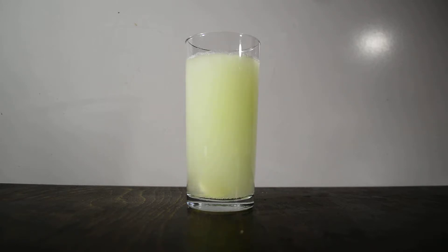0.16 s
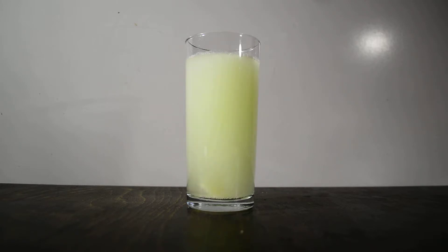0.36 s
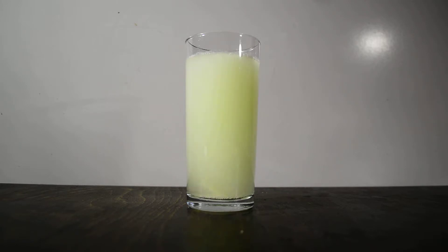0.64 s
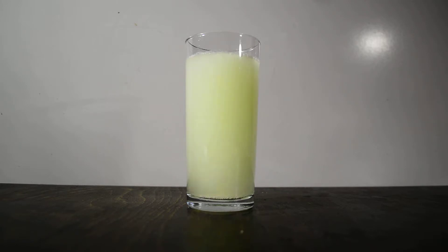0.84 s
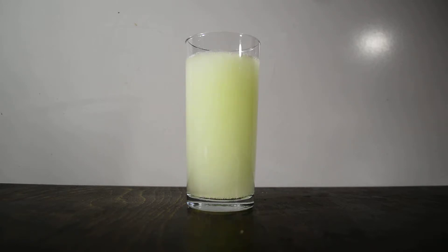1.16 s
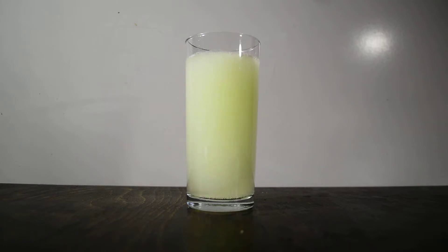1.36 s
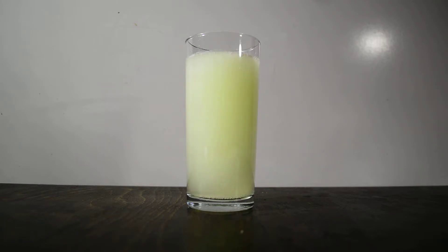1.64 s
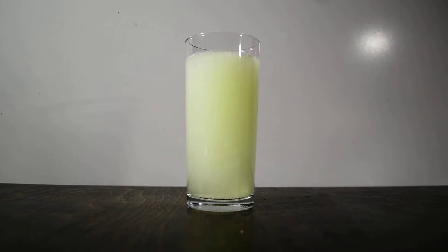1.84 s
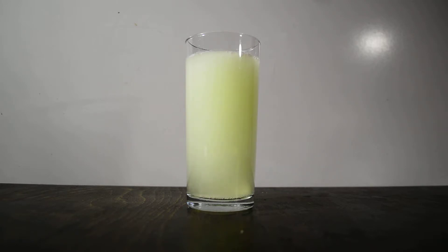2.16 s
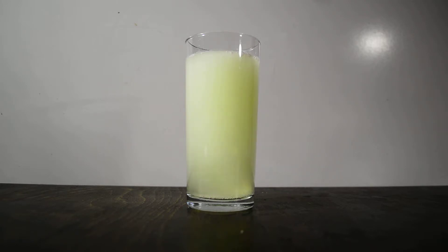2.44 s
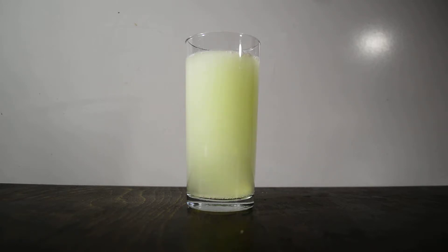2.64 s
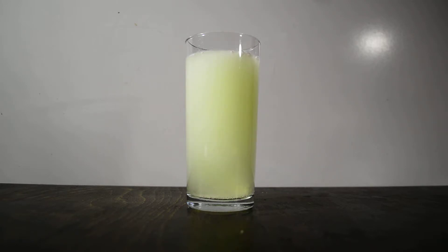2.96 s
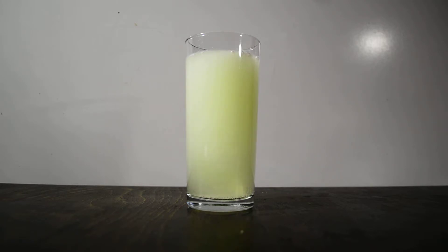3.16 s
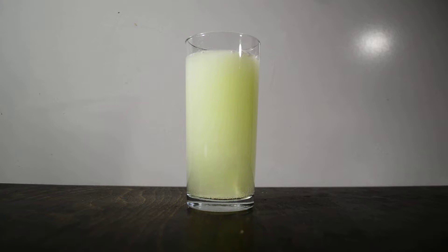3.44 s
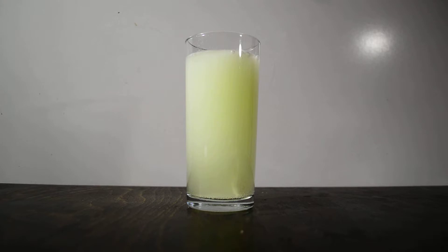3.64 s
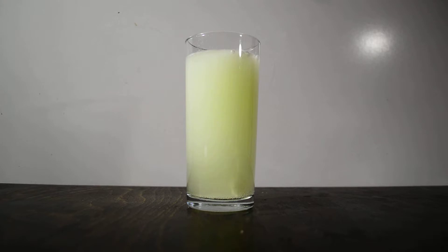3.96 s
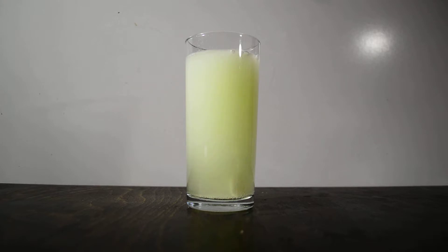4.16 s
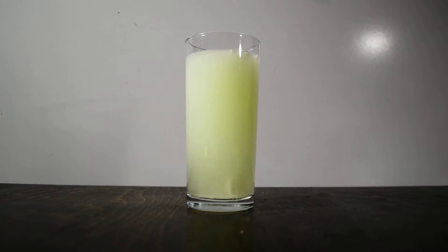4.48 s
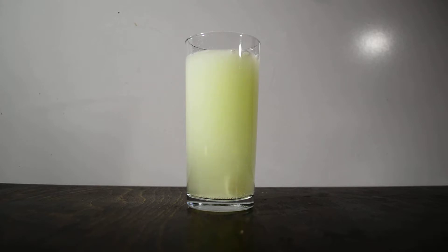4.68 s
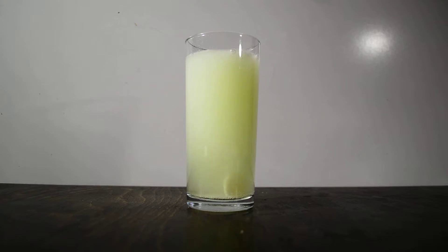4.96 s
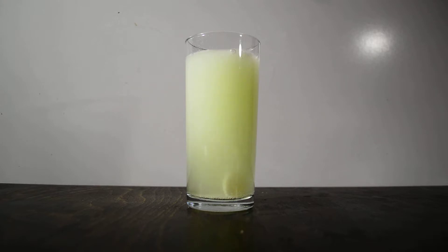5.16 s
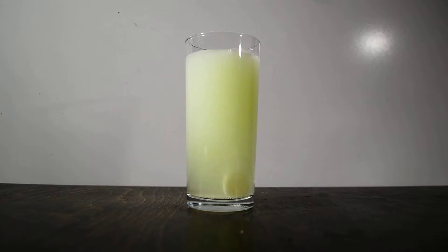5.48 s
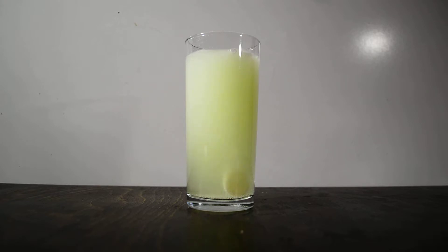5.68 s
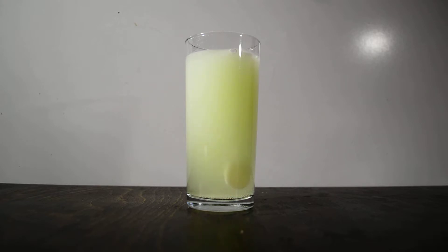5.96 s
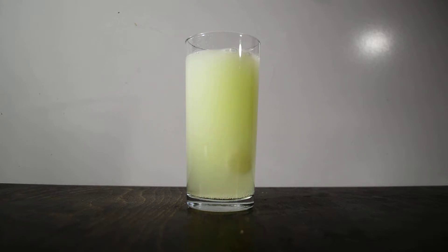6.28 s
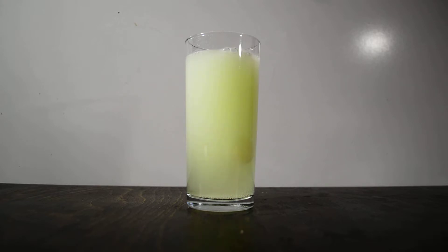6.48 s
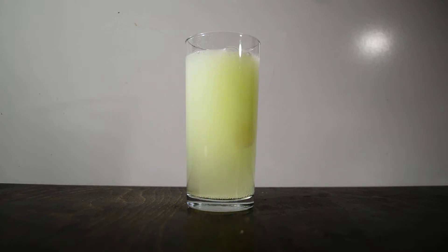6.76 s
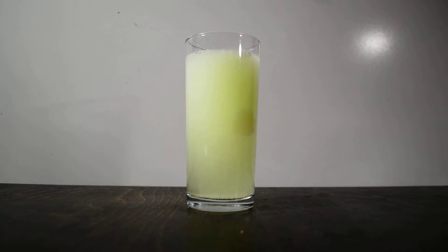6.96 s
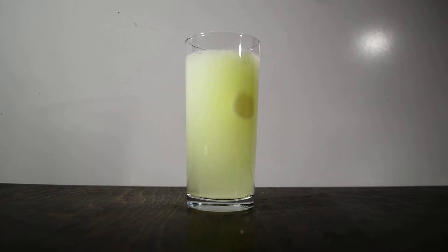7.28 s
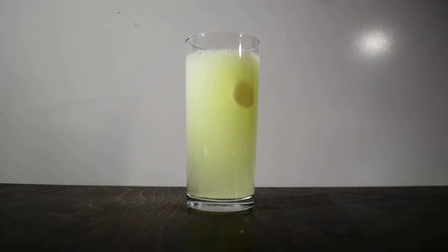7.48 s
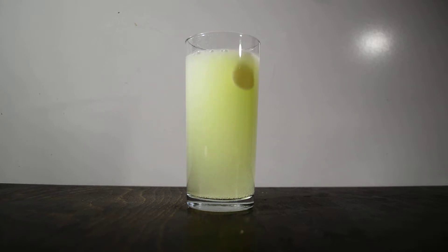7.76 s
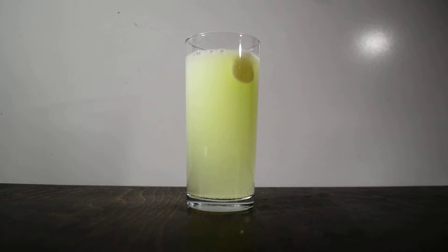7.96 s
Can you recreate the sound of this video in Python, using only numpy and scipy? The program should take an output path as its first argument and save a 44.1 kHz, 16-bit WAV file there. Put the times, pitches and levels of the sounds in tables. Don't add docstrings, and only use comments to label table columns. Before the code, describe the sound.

A tablet dissolves in a tall glass of water, heard very close in stereo. Thousands of tiny bubbles make a continuous bright, crackling hiss that begins fairly soft and fine, then grows louder and coarser as the tablet rises. Single larger bubbles pop sharply to left and right. A faint low electrical hum, room rumble and microphone hiss lie beneath in a quiet indoor room.

```python
import sys
import numpy as np
from scipy import signal
from scipy.fft import rfft, irfft, next_fast_len
from scipy.io import wavfile

SR = 44100
rng = np.random.default_rng(int(sys.argv[2]) if len(sys.argv) > 2 else 0)


def transcribe(signal):
    frames = np.atleast_2d(signal).T
    limited = np.clip(frames, -1, 1)
    pcm = np.round(limited * 32767).astype(np.int16)
    wavfile.write(sys.argv[1], SR, pcm)


def level_to_linear(level):
    exponent = np.asarray(level, float) / 20
    return 10 ** exponent


N = 358091
PADDED = next_fast_len(N)
GRID_HZ = np.arange(PADDED // 2 + 1) * SR / PADDED + 1e-3

SIZE_HZ = [2450, 4200, 5370, 7600, 13000]


def bursts(per_s, cycles, spread_db, surge_db, patch_db):
    size_lean = [.2, 0.97, 0.39, .2, .1]
    classes_db, lean_db = froth()
    strengths = level_to_linear(spread_db * np.minimum(rng.exponential(1, (2, N)), 5))
    strengths = strengths * rng.choice([-1, 1], (2, N))
    surge = drift(10.0) + drift(25.0)
    halves = np.zeros((2, N))
    for k, hz in enumerate(np.geomspace(700, 16500, 40)):
        share = np.array([np.interp(np.log(hz), np.log(SIZE_HZ), one) for one in np.eye(len(SIZE_HZ))])
        lean = (share @ size_lean) * lean_db * [[.5], [-.5]]
        flicker = surge_db * surge + patch_db * np.array([drift(11.0), drift(14.0)])
        born = rng.random((2, N)) < per_s * hz / 5000 / SR
        rings = ring(np.roll(strengths, 997 * k, axis=1) * born, hz, cycles)
        level = level_to_linear(share @ classes_db + lean + flicker)
        halves += level * rings * np.sqrt(hz) / np.std(rings)
    return halves / np.std(halves)


def froth():
    # time [s], froth level [dB], mist level [dB], left-right lean [dB].
    activity = [(0.0, -43.5, -45, 1), (0.4, -43, -44, -1), (1.0, -41.5, -44, -2.5), (1.5, -42, -44.5, -3.5),
                (2.0, -40.5, -42.5, -3), (2.5, -38.5, -42.5, -4), (3.0, -37, -42, -5),
                (3.5, -36, -41, -2.5), (4.0, -35, -41, -5), (4.5, -35, -41, -4), (5.0, -34, -40.5, -4),
                (5.5, -33, -40.5, -1.5), (6.0, -33, -40, -4.5), (6.5, -33, -40, -1),
                (7.0, -32, -40.5, -1.5), (7.55, -31.5, -42, 0), (7.8, -29.5, -43.5, -0.5),
                (8.12, -28, -43.5, 0)]
    size_froth = [1.01, 1.06, 1.09, 0.16, .01]
    size_mist = [-0.18, 0.02, 0.36, 0.53, 1.2]
    # time [s], length [s], pitch [Hz], level [dB].
    rafts = [(.05, 0.26, 5370, 7.5), (.6, 0.14, 5370, -5), (1.25, .08, 4200, 1), (1.3, .25, 5370, -2.5),
             (1.88, .1, 5370, -3), (2.25, 0.12, 5370, -6), (2.8, .1, 5370, 1), (3.5, 0.37, 5370, 2),
             (3.62, .08, 4200, 2.5), (3.9, 0.13, 2450, -1.5), (4.08, 0.11, 4200, 4), (4.4, .15, 5370, 2),
             (4.75, 0.11, 4200, 2.5), (5.0, 0.089, 4200, 2), (5.38, 0.092, 4200, 2.5),
             (5.5, .3, 5370, -0.5), (5.8, 0.27, 4200, 3), (5.997, 0.074, 5370, -2.5), (6.5, 0.16, 4200, -2),
             (6.7, .35, 5370, 2.5), (7.07, .1, 4200, -2), (7.3, 0.11, 5370, 2), (7.383, 0.1, 2450, 2),
             (7.848, 0.29, 2450, 2.5), (8.0, .15, 5370, -1)]
    froth_db, mist_db, lean_db = (curve - curve.mean() for curve in in_time(activity))
    classes_db = np.outer(size_froth, froth_db) + np.outer(size_mist, mist_db)
    return classes_db + swells(rafts, SIZE_HZ), lean_db


def ring(clicks, hz, cycles):
    r = level_to_linear(-60 * hz / (cycles * SR))
    w = 2 * np.pi * hz / SR
    section = [1 - r, 0, r - 1, 1, -2 * r * np.cos(w), r * r]
    return signal.sosfilt([section] * 2, clicks + 1e-18)


def glass_mouth(halves, hz):
    # frequency [Hz], level [dB per Hz].
    surface = [(600, -51), (1000, -21), (1400, -14.5), (2100, -16.5), (3400, -13), (6000, -8.5),
               (9500, -8.5), (13000, -6.5), (14500, -7.5), (15800, -16)]
    # frequency [Hz], width [Hz], lift left [dB], lift right [dB].
    modes = [(2532, 415, 8.5, 10.5), (2956, 460, 4.5, 4.5), (3430, 430, 2.5, -3), (3963, 546, 7, 8.5),
             (4400, 363, 11, 9), (4770, 210, -0.5, 0), (5500, 537, 9, 8.5), (5800, 380, -2, -1.5),
             (6640, 440, 4.5, 4), (7950, 1370, 7, 6.5), (13800, 500, -3.5, -2)]
    # frequency [Hz], left-right likeness [0 to 1].
    likeness = [(800, .99), (2800, 0.95), (3500, 1), (4150, 0.14), (6800, 0.083), (7500, 0.8), (8200, 0.22),
                (10000, 0.023)]
    # frequency [Hz], left over right [dB].
    balance = [(1000, -5), (2500, -4.5), (5000, -4.5), (8000, 3), (12000, 2), (15500, -1)]
    turn = .5 * np.arcsin(np.clip(at_hz(likeness, hz), 0, 1))
    mixed = colour(halves, np.cos(turn)) + colour(halves[::-1], np.sin(turn))
    gain = level_to_linear(at_hz(surface, hz) + at_hz(balance, hz) * [[.5], [-.5]])
    for mode_hz, width_hz, *lift_db in modes:
        lift = level_to_linear(np.array(lift_db))[:, None] - 1
        gain = gain * (1 + lift * resonance(hz, mode_hz, width_hz))
    late_s = np.array([[0], [2.2e-5]])
    return colour(mixed, gain * np.exp(-2j * np.pi * hz * late_s))


def pops(swell_s, trim_db):
    # time of the crest [s], pitch [Hz], left peak [dB], right peak [dB].
    big_bubbles = [(0.0109, 4450, -27, -45), (0.1088, 4360, -33, -31), (0.151, 4390, -28, -45),
                   (0.161, 5360, -29, -40), (0.8857, 4400, -31, -50), (0.9891, 6850, -31, -56),
                   (1.1161, 5600, -30, -38), (1.356, 4320, -43, -28), (1.3741, 5440, -42, -33),
                   (1.6304, 4290, -31, -48), (1.6458, 4430, -34, -51), (2.0345, 5420, -32, -41),
                   (2.6721, 4390, -29, -46), (2.7379, 6570, -29, -41), (2.7497, 5510, -43, -23),
                   (3.6934, 5500, -32, -30), (4.053, 6730, -26, -40), (4.0743, 4260, -23, -23),
                   (4.4857, 4450, -35, -24), (4.6649, 4220, -40, -33), (5.0209, 5190, -22, -42),
                   (5.6884, 4270, -30, -27), (5.819, 5310, -27, -33), (6.102, 5550, -39, -24),
                   (6.2512, 4250, -37, -25), (6.2916, 5600, -43, -21), (6.5147, 5500, -29, -25),
                   (7.2254, 5310, -28, -26), (7.941, 5400, -29, -23), (7.9777, 4150, -31, -17)]
    length = 600
    out = np.zeros((2, N + length))
    t = np.arange(length) / SR
    shape = t / swell_s * np.exp(1 - t / swell_s)
    for s, hz, *peak_db in big_bubbles:
        i = max(round((s - swell_s) * SR), 0)
        peak = level_to_linear(np.array(peak_db)[:, None] + trim_db)
        out[:, i:i + length] += peak * shape * np.sin(2 * np.pi * hz * t)
    return out[:, :N]


def mains_hums():
    # multiple of the mains, left level [dB], right level [dB], lead of the right [rad].
    partials_50 = [(1, -52, -70, 2.0), (2, -74, -76, .6), (3, -63, -63.5, .6), (4, -63, -60.5, .45),
                   (5, -69, -65, 1.0), (6, -73, -72, 1.3), (7, -82, -72, .1), (11, -84, -76, .5),
                   (13, -84, -76, .5), (15, -84, -77, .5)]
    # multiple, left level [dB], right level [dB], lead of the right [rad].
    partials_60 = [(1, -61, -65.5, .7), (2, -65, -66.5, .55), (3, -70.5, -71, .5), (4, -72.5, -72, .5)]
    return hum(partials_50, 50.023, crest_s=-.0055) + hum(partials_60, 60.014, crest_s=-.0017)


def hum(partials, mains_hz, crest_s):
    turn = 2 * np.pi * mains_hz * (np.arange(N) / SR - crest_s)
    starts = rng.uniform(0, 2 * np.pi, len(partials))
    starts[0] = 0
    out = np.zeros((2, N))
    for (k, left_db, right_db, lead), start in zip(partials, starts):
        peak = np.sqrt(2) * level_to_linear(np.array([[left_db], [right_db]]))
        out += peak * np.cos(k * turn + start + np.array([[0], [lead]]))
    return out


def background(hz):
    # frequency [Hz], level [dB per Hz].
    room = [(25, -100), (40, -93.5), (80, -92), (125, -86.5), (200, -86), (290, -86.5), (500, -87.5),
            (800, -90.5), (1500, -88), (4000, -99)]
    # frequency [Hz], left level [dB per Hz], right level [dB per Hz].
    hiss = [(25, -81, -95), (100, -83, -92), (300, -94, -87), (680, -92, -85.5), (1500, -97.5, -86),
            (4000, -130, -89), (15000, -84, -109)]
    # frequency [Hz], width [Hz], level [dB].
    drone = [(122, 18, -67), (350, 75, -66.5)]
    # time [s], length [s], mode [Hz], level [dB].
    stir = [
        (0.05, 0.18, 122, 13),
        (.55, .35, 350, 6.5),
        (1.25, .15, 122, 7),
        (1.9, .3, 122, 11),
        (1.8, 0.17, 350, 3),
        (4.15, .15, 122, 4),
        (5.7, .15, 350, 1),
        (7.05, .15, 122, 6),
        (7.85, 0.39, 350, 6.5),
        (8.1, .1, 122, 8),
    ]
    white = rng.standard_normal((3, N)) * np.sqrt(SR / 2)
    late = np.exp(np.array([[-.3j], [.3j]]) * (hz < 700))
    rumble = colour(white[0], level_to_linear(at_hz(room, hz)) * late)
    for (mode_hz, width_hz, level_db), stir_db in zip(drone, swells(stir, [row[0] for row in drone])):
        swelling = rng.standard_normal(N) * level_to_linear(stir_db)
        boom = colour(swelling, resonance(hz, mode_hz, width_hz) ** 2 * late)
        rumble += level_to_linear(level_db) * boom / np.std(boom)
    hiss_db = np.array([at_hz(hiss, hz, axis=1), at_hz(hiss, hz, axis=2)])
    return rumble + colour(white[1:], level_to_linear(hiss_db))


def resonance(hz, mode_hz, width_hz):
    return 1j * hz * width_hz / (mode_hz ** 2 - hz ** 2 + 1j * hz * width_hz)


def colour(x, gain):
    return irfft(rfft(x, PADDED) * gain, PADDED)[..., :N]


def at_hz(points, hz, axis=1):
    points = np.array(points)
    return np.interp(np.log(hz), np.log(points[:, 0]), points[:, axis])


def in_time(rows):
    s, *columns = np.transpose(rows)
    return np.array([np.interp(np.arange(N) / SR, s, column) for column in columns])


def swells(rows, pitches_hz):
    t = np.arange(N // 100 + 2) * 100 / SR
    out = np.zeros((len(pitches_hz), len(t)))
    for s, length_s, hz, db in rows:
        nearest = np.argmin(abs(np.log(np.array(pitches_hz) / hz)))
        out[nearest] += db * np.exp(-((t - s) / length_s) ** 2)
    return np.array([np.interp(np.arange(N) / SR, t, row) for row in out])


def drift(rate):
    r = np.exp(-80 * np.pi * rate / SR)
    slow = signal.lfilter([1], [1, -2 * r, r * r], rng.standard_normal(N // 40 + 2002))
    slow = slow[2000:]
    return np.interp(np.arange(N) / 40, np.arange(len(slow)), slow / np.std(slow))


def scene():
    halves = bursts(per_s=2600.0, cycles=11.0, spread_db=2.0, surge_db=0.16, patch_db=0.72)
    fizz = level_to_linear(-27.5) * glass_mouth(halves, GRID_HZ)
    big_pops = pops(swell_s=0.001105, trim_db=0.5)
    return fizz + big_pops + background(GRID_HZ) + mains_hums()


def band_limit(x):
    return signal.sosfilt(signal.butter(12, 15750, fs=SR, output="sos"), x)


def record(dry):
    return band_limit(dry)


dry = scene()
out = record(dry)
transcribe(out)
```